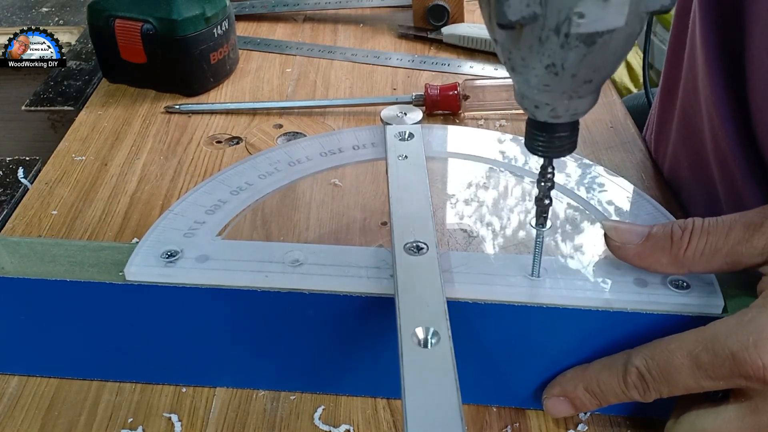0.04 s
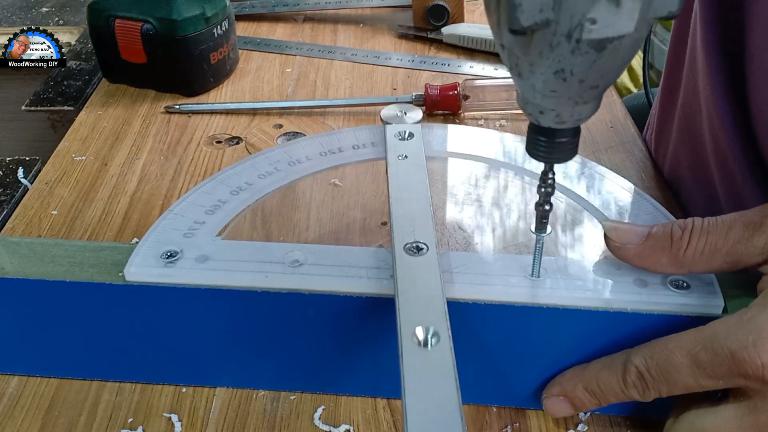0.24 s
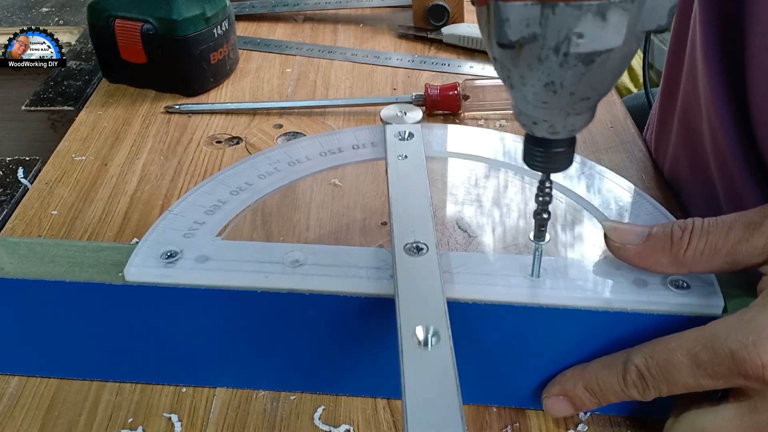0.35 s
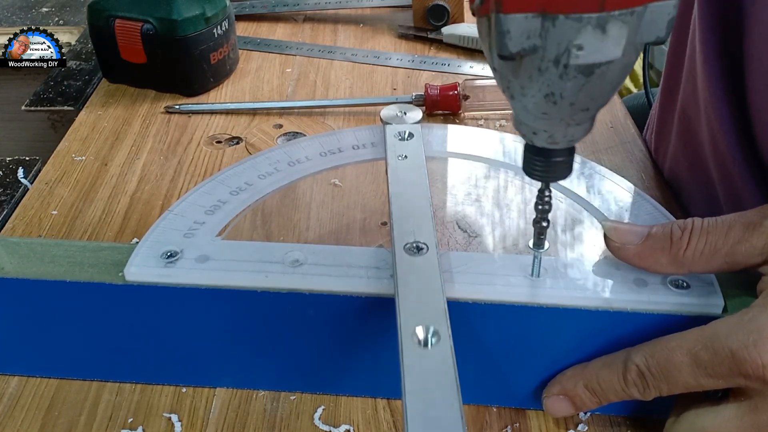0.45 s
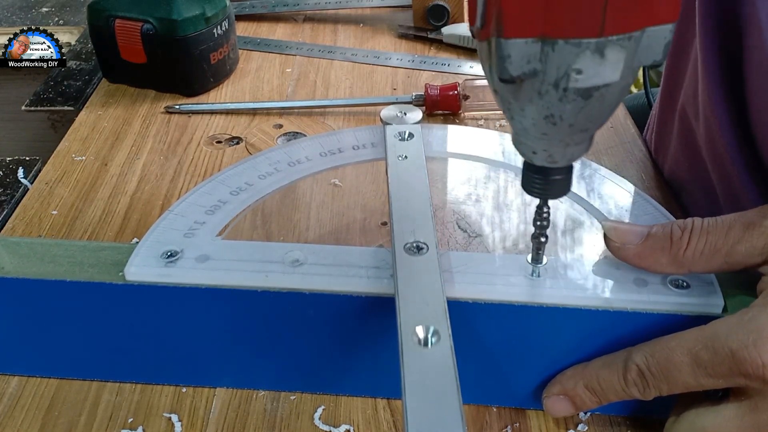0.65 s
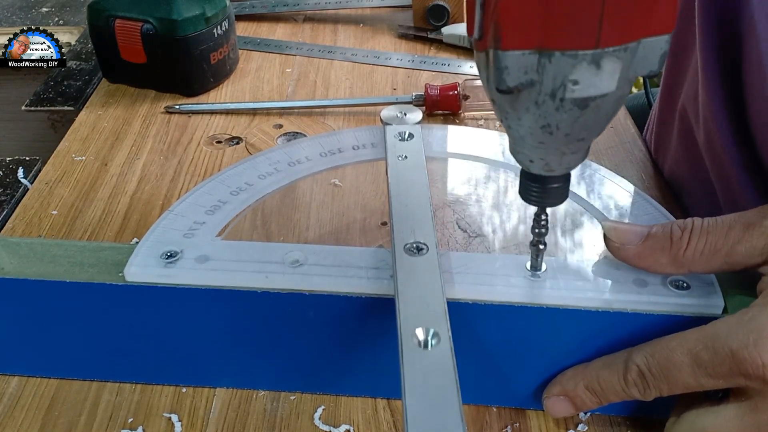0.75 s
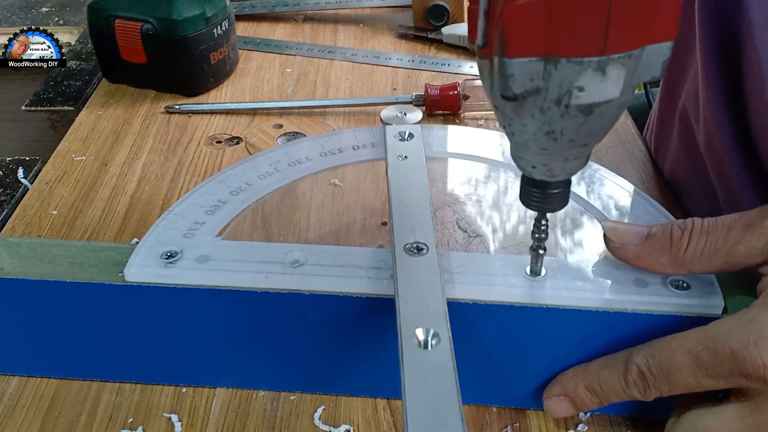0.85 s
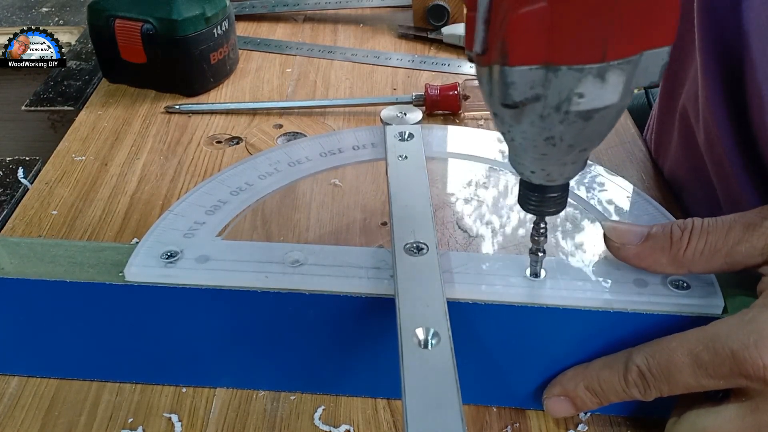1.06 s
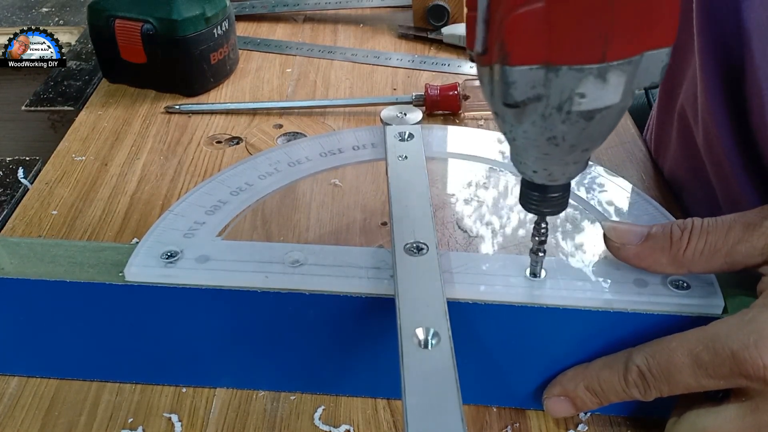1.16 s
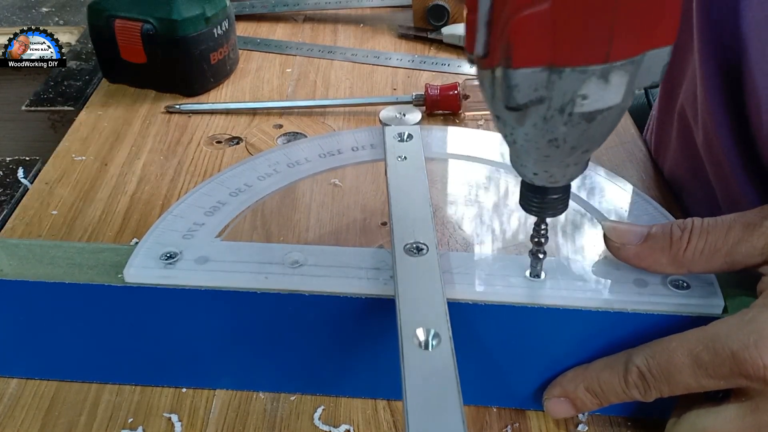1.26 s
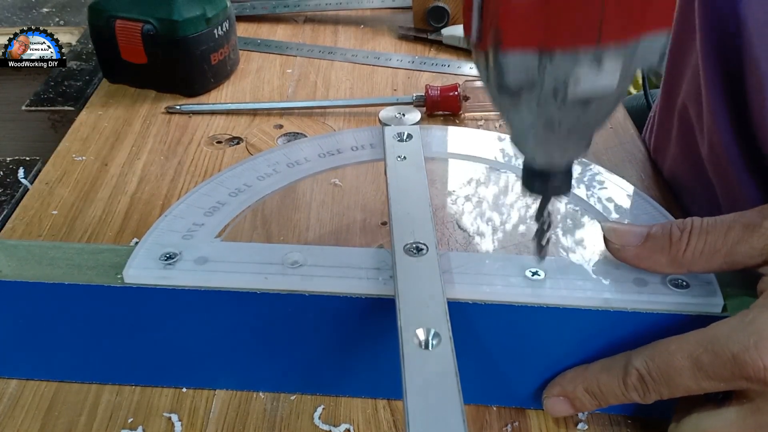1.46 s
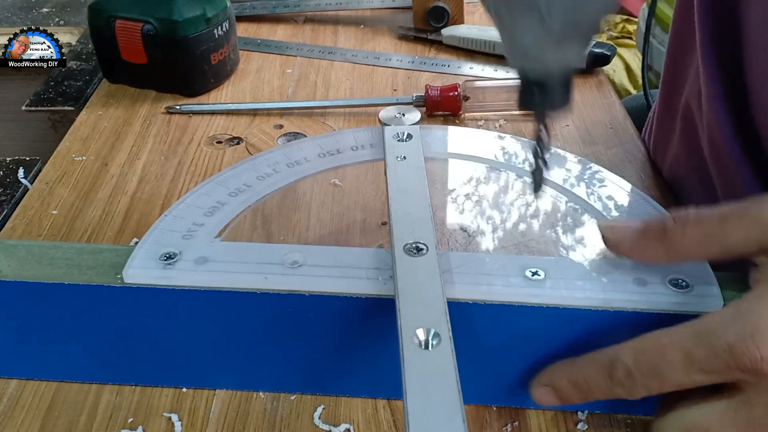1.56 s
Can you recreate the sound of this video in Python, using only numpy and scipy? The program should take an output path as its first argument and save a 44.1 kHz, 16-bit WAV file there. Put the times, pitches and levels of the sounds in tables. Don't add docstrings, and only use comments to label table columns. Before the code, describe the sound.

A cordless drill, very close, starts at about 0.17 s after faint shop hum. A hard click lands at 0.23 as it races up to a bright, rattling gear whine with airy hiss. From 0.74 the pitch sags under load, stalling near 1.0. After a short lull, the bit slips at 1.18-1.42, with loud cracks, scraping and woody thumps, then a small lift-off tick at 1.51. Short room tail, stereo phone, clipped peaks.

```python
import sys
import numpy as np
from scipy import signal
from scipy.fft import rfft, irfft
from scipy.io import wavfile
from scipy.ndimage import uniform_filter1d

SR = 44100
rng = np.random.default_rng(int(sys.argv[2]) if len(sys.argv) > 2 else 0)


def makeup_ratio(level_db):
    decades = np.asarray(level_db, float) / 20
    return 10 ** decades


def wav_record(signal):
    frames = np.transpose(np.atleast_2d(signal))
    bounded = np.clip(frames, -1, 1)
    quanta = np.round(bounded * 32767).astype(np.int16)
    wavfile.write(sys.argv[1], SR, quanta)


N = 70560


def curve(table, col=1):
    a = np.array(table, float)
    return np.interp(np.arange(N) / SR, a[:, 0], a[:, col])


def colour(x, points):
    a, n = np.array(points, float), 2048
    log_hz = np.log(np.arange(n // 2 + 1) * SR / n + 1)
    log_gain = np.interp(log_hz, np.log(a[:, 0]), a[:, 1]) * np.log(10) / 20
    cepstrum = irfft(log_gain)
    cepstrum[1:n // 2] *= 2
    cepstrum[n // 2 + 1:] = 0
    impulse = irfft(np.exp(rfft(cepstrum)))
    return signal.fftconvolve(np.atleast_2d(x), impulse[None], axes=1)[:, :np.shape(x)[-1]]


def unit(x):
    return x / np.sqrt(np.mean(x ** 2))


def walk(rate_hz):
    k = int(SR / rate_hz)
    return unit(uniform_filter1d(uniform_filter1d(rng.standard_normal(N), k), k))


def knocks(per_s, spread_db):
    size = np.minimum(rng.exponential(size=(2, N)), 3)
    hit = rng.random((2, N)) < per_s / SR
    return hit * np.clip(rng.standard_normal((2, N)), -2, 2) * makeup_ratio(spread_db * size)


def resonate(x, hz, width_hz):
    return signal.lfilter(*signal.iirpeak(hz, hz / width_hz, fs=SR), x)


# f/Hz, level/dB
SHOP_COLOUR = [(40, -2.5), (120, 10), (300, 7.5), (900, 0), (2300, -14), (5000, -4.5), (8000, -17),
               (15000, -1)]
# f/Hz, level/dB
CAPSULE_COLOUR = [(1300, 6), (2300, 9), (2900, 9), (3600, 7), (4900, 5), (6000, 8), (6800, -4.5),
                  (10000, -19)]
# t/s, level/dB
SHOP_LEVEL = [(0, 2.5), (1.1, -4.5), (1.5, -0.5), (1.6, -11.5)]
# f/Hz, width/Hz, level/dB
MACHINE_TONES = [(845, 25, -14), (1290, 40, -16)]


def shop():
    noise = rng.standard_normal((2, N))
    tones = sum(makeup_ratio(db) * unit(resonate(noise, hz, width)) for hz, width, db in MACHINE_TONES)
    hum = unit(colour(colour(noise, SHOP_COLOUR), CAPSULE_COLOUR)) + tones
    return hum * makeup_ratio(-49.5 + curve(SHOP_LEVEL) + 3.7 * walk(2.4))


# t/s, tooth mesh f/Hz, rattle level/dB, air and brush level/dB, mesh tone level/dB
MOTOR_RUN = [(.17, 247.6, -44, -75, -85), (.195, 424.4, -26, -37, -26), (.216, 671, -27, -41, -41),
             (.256, 1218, -24.5, -30, -38), (.30, 1408, -23.5, -30, -30), (.36, 1505, -23, -29, -38.5),
             (.43, 1562, -22.5, -28, -32), (.55, 1528, -21, -28.5, -38.5), (.67, 1481, -21.5, -28.5, -39),
             (.738, 1470, -21.5, -28.5, -26), (.79, 1186, -22, -28, -30), (.826, 1024, -24.5, -30.5, -30),
             (.862, 935, -24.5, -31.5, -30.5), (.924, 879.4, -26, -35, -31.5),
             (.955, 669, -23.5, -35.5, -32.5), (.99, 400, -30.5, -48, -33.5), (1.02, 267.2, -48, -66, -77)]


def mesh_phase():
    return 2 * np.pi * np.cumsum(curve(MOTOR_RUN) * (1 + .0022 * walk(186))) / SR


# t/s, level/dB of overtones 2, 3, 4, 5, higher
TOOTH_LOAD = [(.2, -60, -60, -60, -70, -70), (.26, -41, -45, -43, -60, -60), (.33, -39, -38, -36, -60, -60),
              (.43, -37, -32, -42, -55, -60), (.55, -32, -34, -37, -55, -60),
              (.67, -29, -39, -32, -55, -60), (.738, -27, -42, -29, -50, -58),
              (.78, -21, -30, -22, -32, -50), (.8, -22, -34, -23, -36, -45),
              (.815, -26, -40, -33, -28, -36), (.83, -28, -41, -29, -32, -29),
              (.87, -30, -40, -40, -36, -35), (.905, -29, -36, -34, -33, -27),
              (.93, -29, -28, -38, -40, -27), (.945, -36, -28, -38, -40, -36),
              (.975, -52, -50, -50, -52, -50), (1.03, -110, -110, -110, -110, -110)]
# multiple of mesh, TOOTH_LOAD column, level/dB
OVERTONES = [(2, 1, 0), (3, 2, 0), (4, 3, 0), (5, 4, 0), (6, 5, 0), (7, 5, -6), (8, 5, -3)]
# f/Hz, level/dB
CASE_RADIATION = [(1000, 0), (6200, 0), (6600, -14), (7200, -36)]
# t/s, depth/0-1
THROB_DEPTH = [(.72, .8), (.75, .5), (.81, .55), (.85, .85)]


def mesh_whine(turn):
    planet_teeth, planet_peak_s = 24.9, .7
    planet_angle = (turn - turn[int(planet_peak_s * SR)]) / planet_teeth
    throb = 1 + curve(THROB_DEPTH) * np.cos(planet_angle)

    def tone(k, flutter_db):
        flutter = makeup_ratio(flutter_db * np.array([walk(120), walk(120)]))
        return flutter * np.sin(k * turn + np.array([[0], [k]]))

    mesh = tone(1, 3) * makeup_ratio(curve(MOTOR_RUN, col=4))
    overtones = sum(makeup_ratio(db + curve(TOOTH_LOAD, col=c)) * tone(k, 1.8) for k, c, db in OVERTONES)
    return throb * (mesh + colour(overtones, CASE_RADIATION) * makeup_ratio(2))


# f/Hz, width/Hz, level/dB
CASE_RINGS = [(1840, 62, 0), (2126, 234, 4.5), (2430, 190, 5), (2810, 52, -5), (3775, 380, -2.5),
              (4650, 370, 3.5), (5060, 340, 2.5), (5320, 56, -1.5), (5735, 120, 4)]


def case(x):
    rings = sum(makeup_ratio(db) * resonate(x, hz, width) for hz, width, db in CASE_RINGS)
    return unit(unit(colour(x, CAPSULE_COLOUR)) + makeup_ratio(-0.5) * unit(rings))


# f/Hz, level/dB
HOUSING_COLOUR = [(60, -35), (150, -8), (500, 0), (1200, 2.5), (2200, 0.5), (4500, -1.5), (7500, -7.5),
                  (15000, -52)]


def gear_rattle(turn):
    chuck = 1 + 0.048 * np.cos(turn * 32.1 / 1530)
    rattle = case(colour(knocks(9000, 2), HOUSING_COLOUR))
    return rattle * makeup_ratio(0.95 * walk(60)) * chuck * makeup_ratio(curve(MOTOR_RUN, col=2))


# f/Hz, level/dB
AIR_COLOUR = [(5000, -6.5), (7500, -4), (9300, -3), (10300, -10.5), (12000, -4), (13500, -10), (15000, 0.5)]


def cooling_air():
    air = unit(colour(rng.standard_normal((2, N)), AIR_COLOUR))
    return air * makeup_ratio(0.33 * walk(110)) * makeup_ratio(curve(MOTOR_RUN, col=3))


def drill():
    on = curve([(.16, 0.25), (.19, 0.89), (1.0, 0.88), (1.04, 0.46)])
    turn = mesh_phase()
    shaft_angle = turn / 6.4
    beat = 1 + 0.16 * np.cos(shaft_angle)
    shaft = makeup_ratio(-46 + walk(30)) * np.sin(shaft_angle) * (curve(MOTOR_RUN) / 1500) ** 3
    motor = beat * gear_rattle(turn) + cooling_air() + shaft
    return on * beat * mesh_whine(turn), on * motor


# f/Hz, level/dB, t60/s
BOARD_MODES = [(144, -16.5, 0.061), (232, -18, 0.033), (333, -12, 0.066), (375.5, -9.5, 0.077),
               (451.6, -5.5, 0.053), (915, -16, 0.026), (1053, -6.5, 0.029)]


def board_thump(t):
    thump = 0
    for hz, db, t60_s in BOARD_MODES:
        level_luck, pitch_luck = rng.standard_normal(2)
        decay = np.exp(-np.log(1000) * t / t60_s)
        mode = np.sin(2 * np.pi * hz * (1 + 0.012 * pitch_luck) * t)
        thump = thump + makeup_ratio(db + 2 * level_luck) * decay * mode
    rise_s = 0.0032
    return thump * (1 - np.exp(-t / rise_s)) * np.array([[1], [.8]])


# t/s, peak level/dB, ring f/Hz, board thump level/dB
DRILL_KNOCKS = [(0.168, -23, 2414, -49), (0.192, -25, 2170, -42.5), (0.2319, 1, 2165, -19),
                (0.259, -17, 2500, -25.5), (1.041, -15, 2570, -24), (1.057, -20.5, 2400, -19),
                (1.1839, -2, 2680, -46), (1.1888, -9, 2580, -36), (1.2298, 1.5, 1890, -5),
                (1.238, -11.5, 2540, -43), (1.242, -11.5, 2460, -41), (1.2558, -5, 2480, -25),
                (1.2651, -0.5, 5220, -37), (1.275, -13, 2500, -37), (1.287, -8, 2660, -21),
                (1.297, -2, 2550, -9.5), (1.2943, -7.5, 2240, -12), (1.306, -7, 2320, -37),
                (1.311, -21, 2100, -19), (1.344, -29, 2100, -34), (1.352, -22, 2620, -41),
                (1.203, -13, 2400, -42), (1.2095, -14, 5300, -37), (1.361, -5, 1860, -3),
                (1.3628, -8.5, 2720, -34), (1.508, -28.5, 2160, -28.5)]
# t/s, peak level/dB, ring f/Hz, board thump level/dB
CLUTCH_RATCHET = [
    (1.3792, -7, 2200, -22),
    (1.3930, -8, 2200, -26),
    (1.4070, -9, 2300, -30),
    (1.4205, -15, 2000, -34),
]


def drill_knocks():
    length, crack_s, ring_q = 8192, 0.002, 2.4
    out, t = np.zeros((2, N + length)), np.arange(length) / SR
    crack_colour = [(300, -16)] + CAPSULE_COLOUR + [(16000, -6.5)]
    for s, db, hz, thump_db in DRILL_KNOCKS + CLUTCH_RATCHET:
        burst = rng.standard_normal((2, length)) * (t / crack_s) * np.exp(1 - t / crack_s * 1.73)
        crack = makeup_ratio(-2.5) * colour(burst, crack_colour) / 2
        envelope = (t / 0.00044) * np.exp(1 - t / 0.00048)
        envelope = envelope + 0.048 * np.exp(-np.pi * hz / ring_q * t / 2)
        side_phase = rng.random() * 6
        ring = envelope * np.sin(2 * np.pi * hz * t + np.array([[0], [side_phase]]))
        i = int(s * SR)
        out[:, i:i + length] += makeup_ratio(db) * (0.61 * ring + crack) + makeup_ratio(thump_db) * board_thump(t)
    return out[:, :N]


# t/s, level/dB
GRIND_LEVEL = [(.95, -77), (1.03, -44), (1.042, -31), (1.075, -40), (1.11, -60), (1.16, -50.5),
               (1.181, -41.5), (1.187, -28.5), (1.22, -25.5), (1.24, -22.5), (1.31, -24), (1.35, -26.5),
               (1.42, -30), (1.47, -65), (1.505, -55), (1.511, -32.5), (1.56, -103)]
# f/Hz, level/dB
SCRAPE_COLOUR = [(60, 1), (130, 11.5), (350, 13), (700, 12), (2200, 3), (5000, -1), (8000, -12.5),
                 (15000, -12.5)]
# f/Hz, width/Hz, level/dB
BOARD_HUMS = [(330, 16, -13), (369, 16, -13), (450, 20, -17)]


def bit_grind():
    slips = knocks(4000, 2.6)
    hum = sum(makeup_ratio(db) * unit(resonate(slips, hz, width)) for hz, width, db in BOARD_HUMS)
    hum = hum * curve([(1.1, 0.031), (1.22, 0.08), (1.28, 0.58), (1.42, 0.91), (1.5, 0.39)])
    scrape = case(colour(slips, SCRAPE_COLOUR))
    return (scrape + hum) * makeup_ratio(curve(GRIND_LEVEL) + 1.8 * walk(96))


# t/s, level/dB, f/Hz, t60/s
BENCH_JOLTS = [
    (1.047, -28, 153.8, 0.14),
    (1.2294, -8, 89, 0.029),
    (1.363, -32.5, 122, 0.42),
]


def jolts():
    out = np.zeros(N)
    for s, db, hz, t60_s in BENCH_JOLTS:
        t = np.maximum(np.arange(N) / SR - s, 0)
        envelope = np.exp(-np.log(1000) * t / t60_s) * (1 - np.exp(-t / 0.0015))
        out += makeup_ratio(db) * envelope * np.sin(2 * np.pi * hz * t)
    return out * np.array([[1], [-1.0]])


# f/Hz, level/dB
ROOM_COLOUR = [(300, 1.5), (3000, -5.5), (8000, -3.5)]


def room(x):
    t60_s, level_db = 0.21, -11
    t = np.arange(8192) / SR
    tail = rng.standard_normal((2, 8192)) * np.exp(-np.log(1000) * t / t60_s) * (t > .003)
    tail = tail / np.sqrt(np.sum(tail ** 2, axis=1, keepdims=True))
    return makeup_ratio(level_db) * signal.fftconvolve(colour(x, ROOM_COLOUR), tail, axes=1)[:, :N]


# f/Hz, level/dB
SIDE_WIDTH = [(40, -9), (150, -17.5), (350, -15), (700, -3.5), (1400, -6), (2400, -4.5), (4500, 0),
              (15000, -1)]
# f/Hz, level/dB
LEFT_LEAN = [(100, -74), (1200, -15.5), (2500, -5), (4000, -24.5), (15000, -10)]


def stereo(mid, side, room_noise):
    lean = colour(mid, LEFT_LEAN)[0]
    shop_lean = 0.1 * curve([(.2, 0.76), (1.0, .1)]) * room_noise[0]
    port_lag = .4 * (np.roll(mid, shift=2) - np.roll(mid, shift=-2)) / 2
    side = colour(side, SIDE_WIDTH)[0] + lean + shop_lean + port_lag
    return np.array([mid + side, mid - side])


def scene():
    room_noise = shop()
    whine, motor = drill()
    near = motor + drill_knocks() + bit_grind() + jolts()
    near = signal.sosfilt(signal.butter(2, 76, "highpass", fs=SR, output="sos"), near)
    mid, side = near + whine + room(near + .35 * whine) + room_noise
    return stereo(mid, side, room_noise)


def band_limit(x):
    return signal.sosfilt(signal.butter(12, 16530, fs=SR, output="sos"), x)


def record(dry):
    top_cut = signal.ellip(8, .2, 50, 15500, fs=SR, output="sos")
    x = signal.sosfilt(top_cut, np.clip(dry, -1, 1))
    return band_limit(x)


dry = scene()
out = record(dry)
wav_record(out)
```